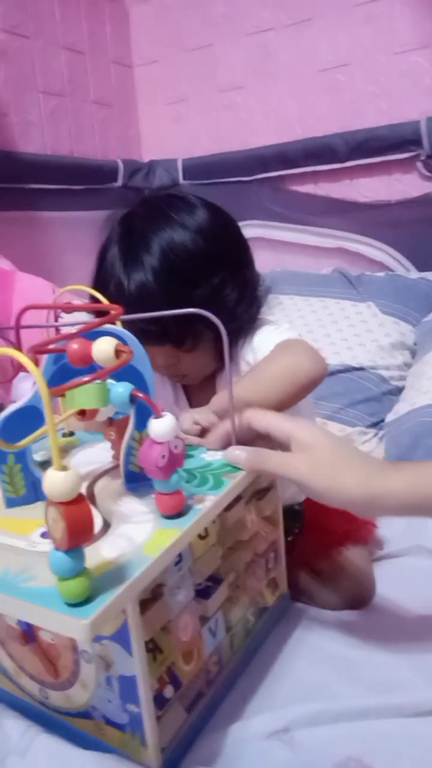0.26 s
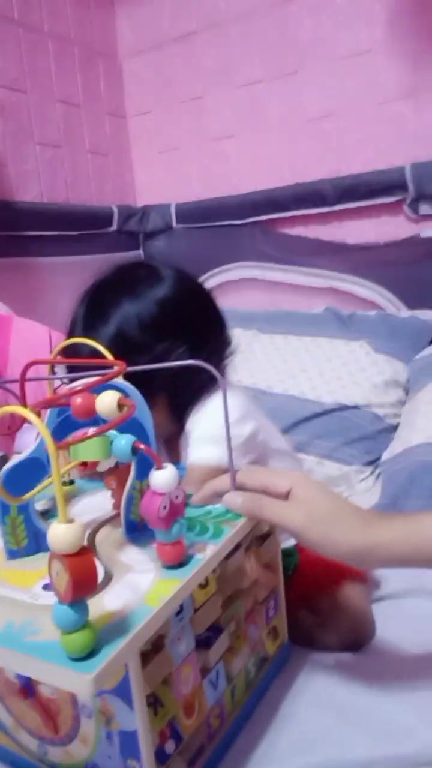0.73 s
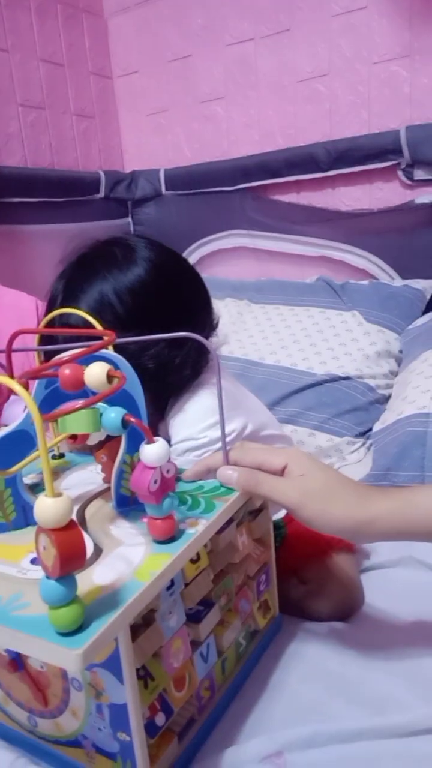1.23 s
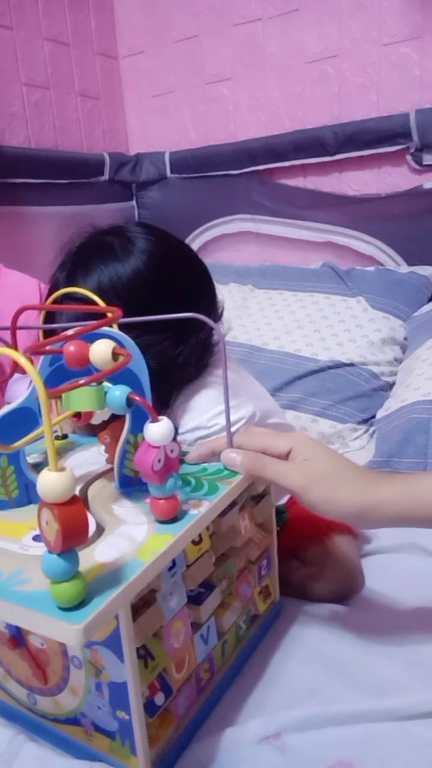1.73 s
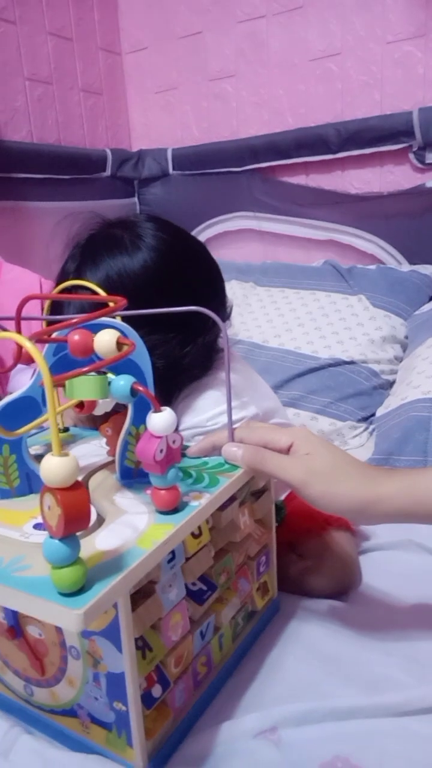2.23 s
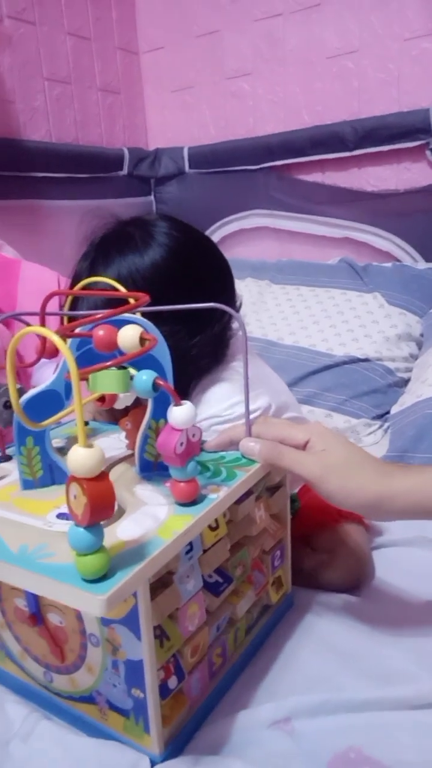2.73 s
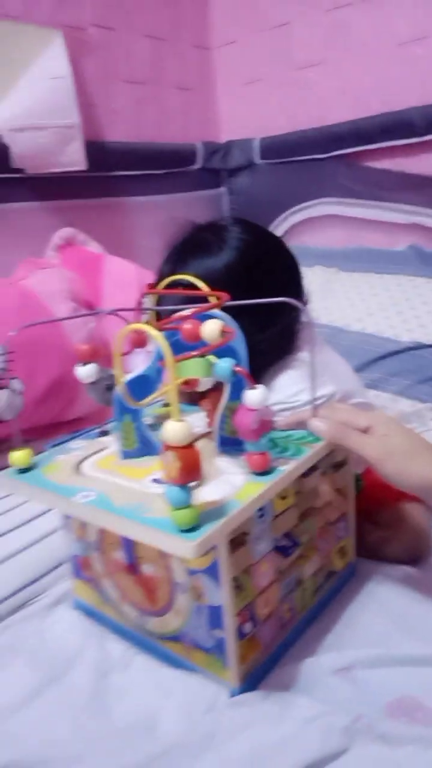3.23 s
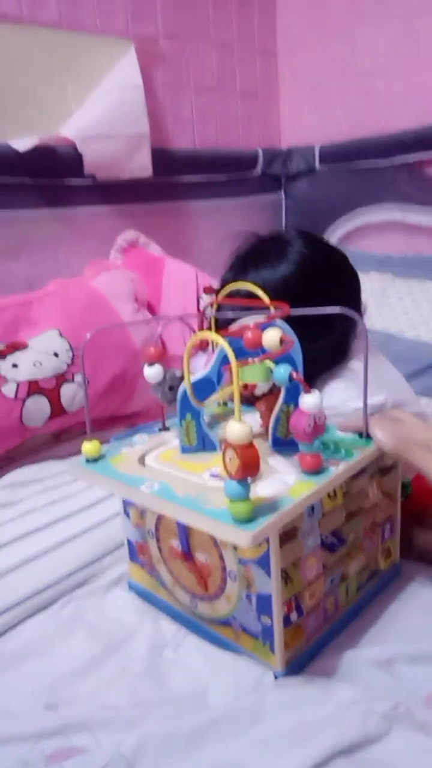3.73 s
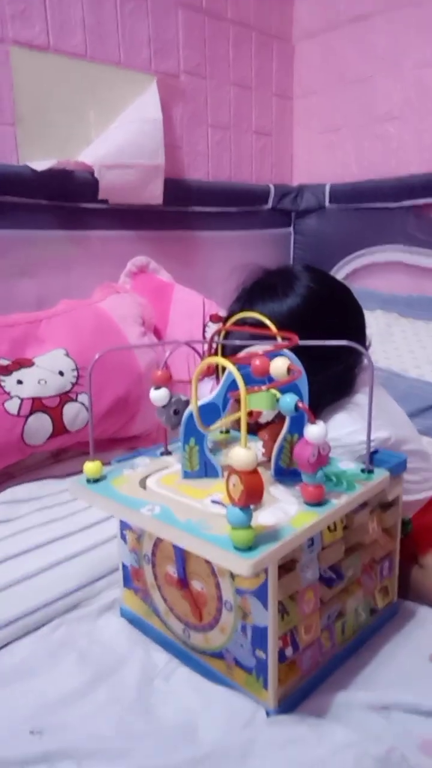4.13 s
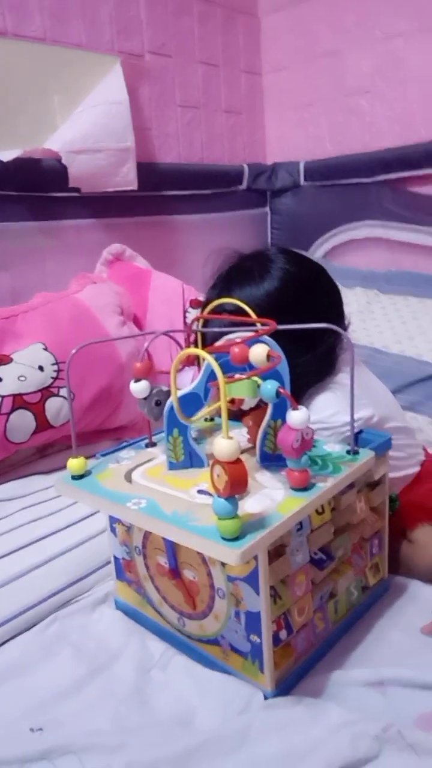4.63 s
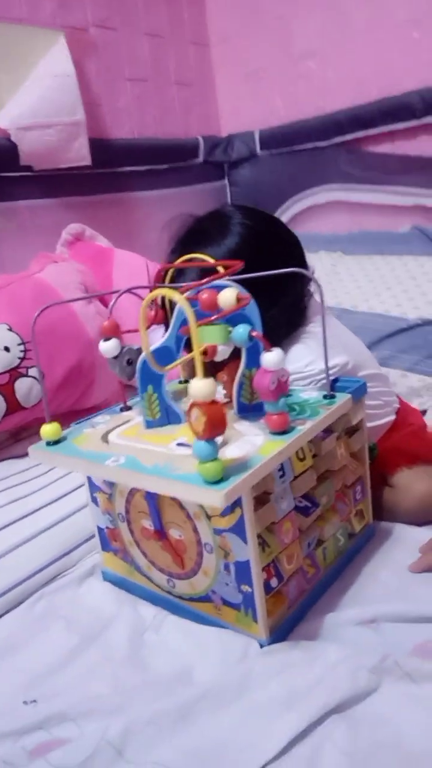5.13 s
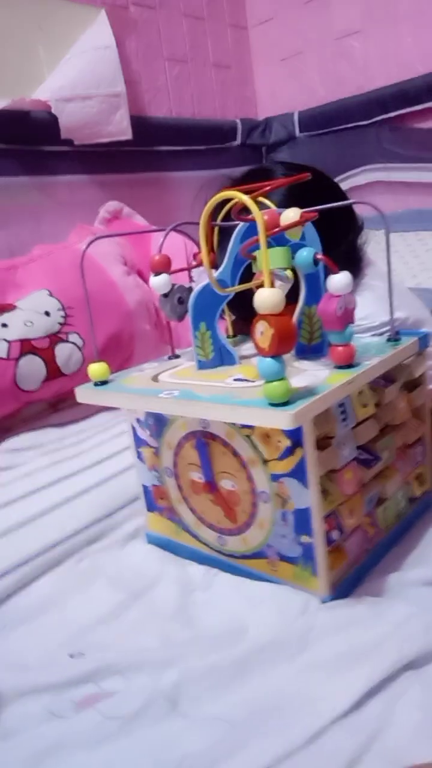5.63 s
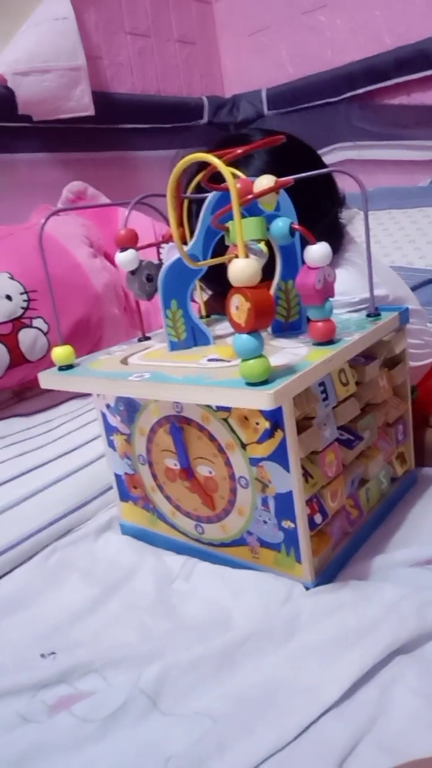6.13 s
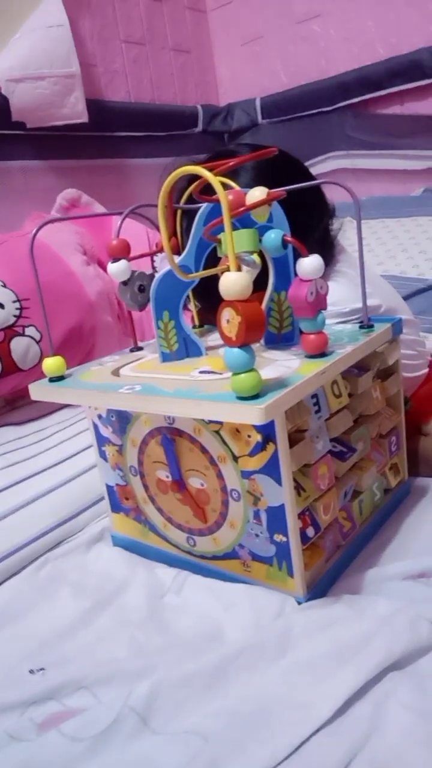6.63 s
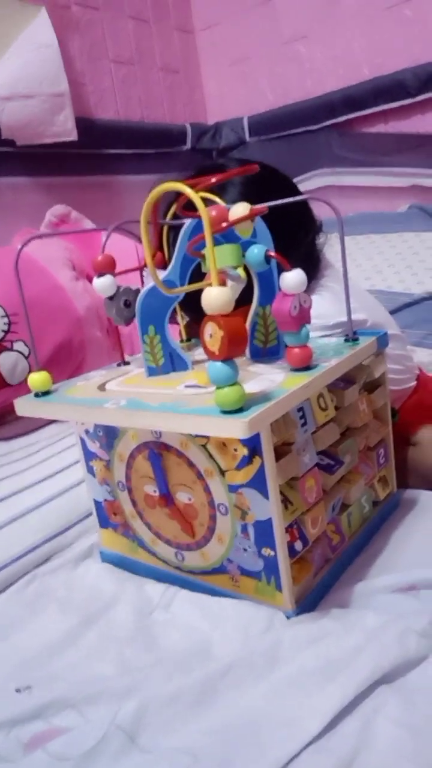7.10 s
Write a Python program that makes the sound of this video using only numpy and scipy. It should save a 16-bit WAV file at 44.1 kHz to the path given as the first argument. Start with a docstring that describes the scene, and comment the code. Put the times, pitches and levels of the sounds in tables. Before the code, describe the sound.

Close, dry wooden toy sounds recorded by a hand-held microphone: soft dragging and small knocks first, then busy, uneven clattering of beads and blocks on a hollow box. Afterwards come sparse clacks among dull bumps and sharp ticks of shifting grip, a short scraping creak with cloth rustle, and finally an almost silent small room with barely audible touches.

```python
"""Wooden activity cube on a bed

Beads and blocks clack, slide, rasp and creak on a hollow wooden box in a small soft room.
Blows and rubbing are bursts of noise or random contacts that set wooden parts ringing.
The hand holding the phone shifts its grip: dull pops and ticks, made as short pressure bumps.
Cloth rustle and a faint hum of shaped noise lie below."""
import sys
import numpy as np
from scipy import signal
from scipy.fft import rfft, irfft
from scipy.io import wavfile

SR = 44100
rng = np.random.default_rng(int(sys.argv[2]) if len(sys.argv) > 2 else 0)


def unload_wav(signal):
    """Save mono or channel-first audio to the path in sys.argv[1] as 16-bit WAV at rate SR, clipped to [-1, 1]."""
    wavfile.write(
        sys.argv[1],
        SR,
        np.round(np.clip(np.atleast_2d(signal).T, -1, 1) * 32767).astype(np.int16),
    )


N = 324576  # length [samples]


def from_db(db):
    """Turns decibels into a factor."""
    return 10 ** (np.asarray(db) / 20)


def rms_one(x):
    """Scales a sound to an average (rms) strength of 1."""
    return x / np.sqrt(np.mean(x ** 2) + 1e-20)


def coloured(x, spectrum):
    """Shapes a noise to a spectrum, joining the points on a log frequency scale; rms 1."""
    hz, level_db = np.transpose(spectrum)
    grid = np.maximum(np.arange(N // 2 + 1) * SR / N, 1)
    gain = from_db(np.interp(np.log(grid), np.log(hz), level_db))
    return rms_one(irfft(rfft(x) * gain, N))


def drift(rate_hz):
    """Smoothed noise of rms 1 that wanders slower at a lower rate."""
    r = np.exp(-2 * np.pi * rate_hz / SR)
    noise = rng.standard_normal(N + SR)
    return rms_one(signal.lfilter([1], [1, -2 * r, r * r], noise)[SR:])  # drop the start-up second


def ring(x, hz, t60):
    """A resonance: a unit click starts a sine of height 1 that falls 60 dB in t60 seconds."""
    r = from_db(-60 / (t60 * SR))
    w = 2 * np.pi * hz / SR
    return signal.lfilter([0, np.sin(w)], [1, -2 * r * np.cos(w), r * r], x + 1e-18)


def grains(per_s, size_db):
    """Random contacts of uneven size and either sign, coming in clumps."""
    born = rng.random(N) < per_s * from_db(5.0 * drift(30)) / SR
    size = from_db(size_db * np.minimum(rng.exponential(1, N), 5))
    return born * size * rng.choice([-1, 1], N)


DRAG_ATTACK_S, DRAG_RELEASE_S = 0.028, 0.049  # at soft = 1


def stroke(start_s, length_s, soft=1):
    """Swells over the attack, holds, fades over the release; soft stretches both."""
    t = np.arange(N) / SR - start_s
    swell = t / (soft * DRAG_ATTACK_S)
    fade = 1 + (length_s - t) / (soft * DRAG_RELEASE_S)
    return np.clip(np.minimum(swell, fade), 0, 1) ** 2


def bass_cut(x):
    """The microphone's low cut thins the deep bass, so pressure bumps swing back and settle."""
    return signal.sosfilt(signal.butter(3, 80.0, "high", fs=SR, output="sos"), x + 1e-18)


def middle_band(x):
    """Keeps the middle of the wood sounds: trims deep bass and the treble above about 5 kHz."""
    x = signal.sosfilt(signal.butter(2, 140.0, "high", fs=SR, output="sos"), x + 1e-18)
    return signal.sosfilt(signal.butter(6, 5100.0, fs=SR, output="sos"), x)


HUM_DB = -55.5  # middle level, before the wavering
# colour of the room hum: (frequency [Hz], relative level [dB per Hz])
HUM_SPECTRUM = [(15, -31.5), (32, -13), (101, 3.5), (227, -3), (410, -8), (495, -3.5), (614, -14),
                (722, -2), (871, -11), (1570, -21), (2770, -17), (3930, -24), (5730, -42), (15500, -46.5)]


def hum():
    """Air and distant machinery: shaped noise whose level wavers slowly."""
    level = from_db(HUM_DB + 3.6 * drift(2.5))
    return level * coloured(rng.standard_normal(N), HUM_SPECTRUM)


SWISH_SOFT = 2.2  # swells and fades slower than a drag
# colour of brushing cloth and skin: (frequency [Hz], relative level [dB per Hz])
RUSTLE_SPECTRUM = [(710, -40.5), (1200, -7), (1950, -2), (2910, -12), (3610, -5.5), (6050, -15),
                   (8640, -16), (15800, -23.5)]
# thin high swishes, barely heard: (start [s], length [s], level [dB], centre [Hz])
SWISHES = [(5.397, 0.26, -65.5, 8960), (6.215, 0.092, -68, 7300), (6.496, 0.53, -82.5, 6900)]


def rustle(gain):
    """Cloth and skin brushing: fine bright grains, and a few narrow swishes."""
    fine = rng.standard_normal(N) + 0.55 * grains(4000, 3.0)
    broad = gain * from_db(1.8 * drift(30.13)) * coloured(fine, RUSTLE_SPECTRUM)
    t = np.arange(N) / SR
    tones = np.zeros(N)
    for start_s, length_s, db, hz in SWISHES:
        tones += from_db(db) * stroke(start_s, length_s, SWISH_SOFT) * np.sin(2 * np.pi * hz * t)
    return broad + drift(940) * tones  # random strength turns each tone into a narrow noise


PORT_HZ, PORT_T60_S, PORT_RING = 3250, 0.0028, 0.7  # the microphone port rings after a sharp tick
# grip pops on the phone body, the narrowest being dry ticks, before the port ring and bass cut:
# (time [s], pressure peak [dB], width [ms])
GRIP_POPS = [(0.057, -23, 1.9), (1.463, -22, 0.54), (3.029, -14.5, 1.06), (3.096, -20.5, 0.52),
             (3.113, -19, 0.82), (3.555, -16, 3.4), (3.338, -10.5, 0.5), (3.354, -10, 0.6),
             (3.3888, -20.5, 1.15), (3.4805, -24.5, 1.6), (3.643, -21, 0.7), (3.6646, -20, 0.58),
             (3.7063, -5, 0.74), (3.714, -17.5, 0.75), (3.7543, -7, 0.74), (3.8082, -6, 0.66),
             (4.1022, -12.5, 0.71), (4.1225, -22, 0.43), (4.1345, 3, 0.23), (4.1503, -12, 0.29),
             (4.2885, -27, 0.57), (4.6063, -21.5, 0.59), (4.6205, -18.5, 0.56), (4.6397, -10.5, 0.95),
             (4.6777, -13.5, 0.65), (4.84, -12.5, 0.97), (4.8687, -8.5, 0.61), (4.917, -5, 1.33),
             (4.945, -9.5, 0.68), (4.9744, -5, 0.84), (4.983, -9.5, 1.6), (4.991, -12.5, 0.71),
             (5.011, -12.5, 1.5), (5.0654, -13.5, 1.9), (5.0851, -13.5, 1.8), (5.3126, -4.5, 0.2),
             (7.282, -30, 2.45), (4.081, -29.5, 0.12), (4.084, -23, 0.11), (4.114, -25, 0.13),
             (4.1256, -20, 0.18), (4.1306, -13, 0.19), (4.144, -15.5, 0.1), (4.159, -25, 0.1),
             (5.175, -14.5, 0.088), (5.257, -24.5, 0.039), (5.282, -27, 0.052)]


def grip():
    """Bell-shaped pressure bumps at the microphone port, which rings at their steep sides."""
    bumps = np.zeros(N)
    for s, peak_db, width_ms in GRIP_POPS:
        near = int(s * SR) + np.arange(-300, 300)
        offset_ms = (near / SR - s) * 1000
        bumps[near] -= from_db(peak_db) * np.exp(-1.6 * (offset_ms / width_ms) ** 2)
    return bumps + PORT_RING * ring(np.gradient(bumps), PORT_HZ, PORT_T60_S)


CREAK_S, CREAK_GAP_S, CREAK_GAP_RATIO = 5.02, 0.013, .92  # start, first gap, each gap over the last
CREAK_DB, CREAK_SWELL_DB = -41, 1  # drive of the first slip, rise per slip over the first six steps


def creak():
    """The pushed box sticks and slips: fourteen ticks, crowding together, ring the clack modes."""
    k = np.arange(14)
    gaps = CREAK_GAP_S * CREAK_GAP_RATIO ** k * rng.uniform(0.98, 1.0, len(k))
    s = CREAK_S + np.cumsum(gaps) - CREAK_GAP_S
    strength_db = CREAK_DB + CREAK_SWELL_DB * np.minimum(k, 6) + rng.normal(0, 2.2, len(k))
    slips = np.zeros(N)
    slips[(s * SR).astype(int)] = from_db(strength_db)
    burst = signal.lfilter([1], [1, -from_db(-60 / (0.014 * SR))], slips + 1e-18)  # quick fade
    shaken = burst * rng.standard_normal(N)
    body = sum(from_db(db - 26) * ring(shaken, hz, CLACK_T60_S) for hz, db in CLACK_MODES)
    crack = from_db(-12.5) * burst * coloured(rng.standard_normal(N), SNAP_SPECTRUM)
    return middle_band(body) + crack


RASP_SOFT, RASP_T60_S = 0.52, 0.013  # swells and fades quicker than a drag; ringing time
# a bead drawn along a wire or edge, before the middle band filter:
# (start [s], length [s], level [dB], note [Hz])
BEAD_RASPS = [(1.317, 0.12, -37, 760), (1.365, 0.114, -47.5, 3720), (1.355, .04, -46, 3020),
              (5.041, 0.073, -40, 4080), (5.04, 0.075, -38, 2880), (5.069, 0.062, -40, 1930),
              (5.432, 0.17, -65.5, 3790), (5.558, .07, -64.5, 2500)]


def rasp():
    """A drawn bead rasps on one note: dense contacts into one resonance, under a stroke."""
    out = np.zeros(N)
    for start_s, length_s, db, hz in BEAD_RASPS:
        note = rms_one(ring(grains(1500, 2.1), hz, RASP_T60_S))
        out += from_db(db) * stroke(start_s, length_s, RASP_SOFT) * note
    return out


DRAG_UNEVEN_DB = 2.5  # pressure of the drag wavers
# drags of a hand, bead or block over the cube, levels before wavering and filtering:
# (start [s], length [s], wood scrape [dB], box rumble [dB], cloth rustle [dB])
CUBE_DRAGS = [(0, 0.44, -60, -53.5, -73.5), (0.611, 0.061, -60, -61, -72), (0.74, 0.1, -64.5, -48.5, -80),
              (0.825, 0.23, -48.5, -38.5, -64), (1.283, 0.09, -48.5, -41.5, -68),
              (1.376, 0.12, -44.5, -37, -61), (1.585, 0.18, -56, -42.5, -67.5),
              (1.788, 0.077, -49.5, -37, -60.5), (1.888, 0.37, -63, -46.5, -87),
              (2.267, 0.067, -48.5, -33, -56), (2.435, 0.074, -56, -68, -67), (2.562, .15, -43, -38.5, -59),
              (2.802, 0.23, -48.5, -43.5, -62), (2.949, 0.16, -51.5, -36, -66),
              (3.117, 0.24, -70, -38.5, -92), (3.33, 0.12, -55, -46, -63.5), (3.474, 0.31, -55, -43, -71),
              (3.785, 0.13, -58.5, -54.5, -60.5), (4.07, 0.084, -54, -38, -59),
              (4.242, 0.094, -64, -55, -62.5), (4.544, 0.14, -69, -46, -83),
              (4.839, 0.26, -60, -39.5, -75.5), (5.039, 0.081, -40, -29.5, -53),
              (5.128, 0.16, -49, -43, -52), (5.282, 0.11, -61, -66, -54), (5.411, 0.23, -63, -54, -63)]


def dragging():
    """The hand's pressure: gains of scrape, rumble and rustle, summed over all drags."""
    gains = np.zeros((3, N))
    for start_s, length_s, *levels_db in CUBE_DRAGS:
        gains += from_db(levels_db)[:, None] * stroke(start_s, length_s)
    return gains * from_db(DRAG_UNEVEN_DB * drift(15.0))


SCRAPE_TILT_DB = 5.5  # dragging is brighter than striking [dB per octave]


def sliding(scrape, rumble):
    """Wood dragged over wood and wire: dense contacts ring the same bodies as the blows."""
    bright = np.zeros(N)
    for hz, db in CLACK_MODES:
        gain = from_db(db + SCRAPE_TILT_DB * np.log2(hz / 2500))
        bright += gain * ring(grains(2500, 3.2), hz, 0.0087)
    touch = grains(800, 0.46)
    panel = rms_one(sum(from_db(db) * ring(touch, hz, PANEL_T60_S) for hz, db in PANEL_MODES))
    hollow = rms_one(sum(from_db(db) * ring(touch, hz, HOLLOW_T60_S) for hz, db in HOLLOW_MODES))
    return scrape * rms_one(bright) + rumble * (panel + 0.21 * hollow)


SETTLE_S = 0.015  # loose parts chatter on after a blow: time to fall to 37 %
OWN_NOTE_DB = 6  # level of the struck piece's own note, before the tilt


def struck(peak_db, modes, t60, stretch, rise_ms, settle_db, spread_db, detune,
           tilt_db=0, own_hz=None, push=0, first=0):
    """Each blow's rattle of contacts rings a body; neighbours, tuned otherwise, chatter on."""
    blow_table = np.array(CUBE_BLOWS)
    s = blow_table[:, 0]
    contact_ms = np.clip(blow_table[:, [4]], .3, 20)
    after = np.arange(2048)
    u = after / (stretch * contact_ms * SR / 1000)  # time counted in contact lengths
    noise = rng.standard_normal((len(s), 2, len(after)))
    # a first touch, then contacts that swell and fade
    rattle = noise[:, 0] * (u + 0.011) ** 0.86 * np.exp(-u) + first * (after == 0)
    # a steady push at the body's first mode swells and fades, making the note clearer
    rattle += push * u * np.exp(-u) * np.sin(2 * np.pi * modes[0][0] * after / SR)
    settling = noise[:, 1] * from_db(settle_db) * np.exp(-after / (SETTLE_S * SR))

    # chance axes: blow, strength or pitch, struck piece or neighbours, mode
    chance = rng.standard_normal((len(s), 2, 2, len(modes)))
    t = after[:1024] / SR
    body = np.zeros((len(s), 2, len(t)))
    for k, (hz, mode_db) in enumerate(modes):
        tilt = np.reshape(tilt_db, (-1, 1)) * np.log2(hz / 2500)
        gain = from_db(mode_db + spread_db * chance[:, 0, :, k] + tilt)
        pitch = hz * (1 + detune * chance[:, 1, :, k])
        body += gain[..., None] * np.sin(2 * np.pi * pitch[..., None] * t)
    if own_hz is not None:
        own_gain = from_db(OWN_NOTE_DB + tilt_db * np.log2(own_hz / 2500))
        body[:, 0] += own_gain[:, None] * np.sin(2 * np.pi * own_hz[:, None] * t)
    body *= (1 - np.exp(-t / (rise_ms / 1000))) * from_db(-60 * t / t60)  # ringing builds, then dies

    contacts = np.stack([rattle, settling], axis=1)
    blows = signal.fftconvolve(contacts, body, axes=2).sum(axis=1)
    blows *= (from_db(peak_db) / np.max(np.abs(blows), axis=1))[:, None]
    out = np.zeros(N)
    np.add.at(out, (s * SR).astype(int)[:, None] + np.arange(blows.shape[1]), blows)
    return out


CLACK_T60_S, HOLLOW_T60_S, PANEL_T60_S = .0065, 0.012, 0.017  # times to fall 60 dB
# blows on the cube, peaks before room and filters; contact time is limited, then stretched per part:
# (time [s], clack peak [dB], hollow tock peak [dB], panel thud peak [dB], contact time [ms],
#  clack tilt [dB per octave], struck piece's own note [Hz])
CUBE_BLOWS = [(0.053, -34.5, -40, -28, 8.5, 13, 1940), (0.0921, -22, -45, -37, 1.4, 11, 2000),
              (0.305, -28, -34.5, -29.5, 0.23, 12, 2500), (0.814, -45, -23.5, -53, 2.4, 5, 2180),
              (0.86, -39, -28.5, -32, 3.1, -9, 1980), (0.902, -30, -32, -24, 2.7, -5, 2450),
              (0.9197, -20, -26, -29, 3.1, -8.5, 2420), (0.936, -43, -16.5, -68, 5.1, 2, 1170),
              (0.9726, -29.5, -26.5, -46, 3.5, -2, 2590), (1.309, -19.5, -23.5, -26.5, 3, -14, 2360),
              (1.4343, -27.5, -28.5, -50, 1, 0, 2460), (1.452, -27.5, -17.5, -23, 1.25, -5, 1370),
              (1.6471, -19.5, -16.5, -15, 2.15, -7, 1150), (1.6678, -5, -7.5, -7.5, 2.1, 7.5, 3340),
              (1.6942, -22, -23, -24, 2.2, 7, 1150), (1.705, -10, -8.5, -23.5, 3.3, 5, 2940),
              (1.738, -2, -17, -9.5, 1.8, -2, 3620), (1.753, -19.5, -18.5, -25, 5.5, -2, 1220),
              (1.801, -29, -29.5, -48, 2.5, 8, 1260), (1.8934, -25.5, -34, -24, 4, -11, 2020),
              (1.9271, -22, -25.5, -21, 2.8, -1.5, 1250), (1.9649, -8.5, -3.5, -57, 4.04, 3, 3840),
              (1.985, -12.5, -34, -21.5, 4.6, 10, 2880), (2.023, -11, -15, -15.5, 1.07, -11, 2490),
              (2.083, -60, -28, -52, 2, -3, 1150), (2.101, -49, -30.5, -50, 1.5, 1, 2400),
              (2.127, -8, -19.5, -15.5, 2.3, -4.5, 2520), (2.1897, -55, -47, -26, 1.4, 2.3, 1150),
              (2.225, -50, -49, -27, 1.6, 0, 1150), (2.2931, -19.5, -17, -15.5, 4.3, 2.5, 2310),
              (2.3088, -2.5, -11.5, -9, 1.46, 9, 2460), (2.3934, -7, -14.5, -11.5, 2.04, -7.5, 3600),
              (2.5047, -18, -15, -12, 1.66, -8, 2540), (2.5182, -43, -23.5, -19.5, 1.6, -13, 1160),
              (2.5398, -2, -12.5, -14, 1.5, 8, 3604), (2.5785, -1, -15.5, -42, 1.88, -9.5, 2250),
              (2.6137, -9, -11.5, -14.5, 1.57, -6, 2830), (2.6971, -17.5, -9, -54.5, 5.3, 17, 2300),
              (2.718, -28.5, -26, -45, 1.6, 1, 2350), (2.7543, -26, -30, -31.5, 2.3, 0.5, 2340),
              (2.7672, -22, -13.5, -20.5, 1.2, 0, 1140), (2.874, -2.5, -22, -15, 0.76, 0, 3780),
              (2.8882, -10.5, -20, -15, 0.63, -22, 3460), (2.922, -41, -26, -20, 1.5, -18, 1150),
              (2.9407, -42, -48, -23, 1.4, -4, 1150), (2.9846, -22, -23, -22.5, 0.61, -1, 1150),
              (3.214, -23.5, -30.5, -55, 3.4, -14, 1230), (3.254, -27.5, -35, -55, 4.1, -27, 1680),
              (3.3885, -31, -62, -48.5, 10, -1, 2020), (3.531, -6, -22, -39, 0.55, -10.5, 1314),
              (3.555, -26, -29, -25.5, 0.65, -3.5, 1260), (3.877, -11, -8.5, -17.5, 4.1, 15.5, 3110),
              (5.162, -11.5, -13.5, -42, 1.4, 15, 4130), (5.194, -37, -28.5, -53, 1.5, 5, 3500),
              (5.3112, -18.5, -20.5, -11.5, 1.2, 26, 2340), (5.516, -58, -33.5, -67, 3.9, -5, 1930),
              (6.2526, -59, -37, -51, 23, 15, 1460), (6.379, -46, -56, -43, 5.1, 31, 3480),
              (6.768, -53.5, -65, -38.5, 3, -5, 2160)]
# beads and thin blocks: (frequency [Hz], relative level [dB])
CLACK_MODES = [(1150, -9), (1260, -4.5), (2020, 3), (2300, 2.5), (2550, 3.5), (2900, 1), (3200, -1),
               (3600, 1), (4050, -9), (4450, -18.5), (4900, -23.5)]
# air and walls of the box: (frequency [Hz], relative level [dB])
HOLLOW_MODES = [(840, -0.5), (965, -14)]
# large sides of the box: (frequency [Hz], relative level [dB])
PANEL_MODES = [(250, -13), (330, 5), (430, -4), (540, -10)]
# colour of the contact crack: (frequency [Hz], relative level [dB per Hz])
SNAP_SPECTRUM = [(4000, -23), (5500, 1), (7500, -12), (11000, -14), (14500, -23.5)]


def knocks():
    """Bright clack, hollow tock that builds up more slowly, panel thud and a brief crack."""
    s, clack_db, tock_db, thud_db, _, tilt_db, own_hz = np.transpose(CUBE_BLOWS)
    clack = struck(clack_db, CLACK_MODES, CLACK_T60_S, 0.83, 0.79, settle_db=-19.0, spread_db=2.5,
                   detune=0.05, tilt_db=tilt_db, own_hz=own_hz, first=2.7)
    tock = struck(tock_db, HOLLOW_MODES, HOLLOW_T60_S, 0.98, 1.5, settle_db=-30.5, spread_db=0,
                  detune=0.072, push=0.21)
    thud = struck(thud_db, PANEL_MODES, PANEL_T60_S, 0.86, 3.0, settle_db=-31.0, spread_db=1.0,
                  detune=0.09)
    marks = np.zeros(N)
    marks[(s * SR).astype(int)] = from_db(clack_db + .5 * tilt_db - 35.5)  # brighter blows crack more
    dying = signal.lfilter([1], [1, -from_db(-60 / (0.034 * SR))], marks + 1e-18)
    crack = dying * coloured(rng.standard_normal(N), SNAP_SPECTRUM)
    return middle_band(clack + tock + thud) + crack


ROOM_T60_S, ROOM_DB, WALL_CUT_HZ = .15, -12.5, 2200  # tail; its level before the treble loss; its cut
ECHO_S, ECHO_DB = 0.011, -16  # nearest wall, level before the treble loss


def room(x):
    """One wall echo and a short diffuse tail, dull in the treble."""
    t = np.arange(int(.4 * SR)) / SR
    reply = rng.standard_normal(len(t)) * from_db(-60 * t / ROOM_T60_S) * np.minimum(t / 0.019, 1)
    reply *= from_db(ROOM_DB) / np.sqrt(np.sum(reply ** 2))
    reply[int(ECHO_S * SR)] += from_db(ECHO_DB)
    reply = signal.lfilter(*signal.butter(1, WALL_CUT_HZ, fs=SR), reply)
    return x + signal.fftconvolve(x, reply)[:N]


def scene():
    """Adds the sources; only the blows get the room's echo, and the hum joins after the low cut."""
    scrape, rumble, brush = dragging()
    rubbing = middle_band(sliding(scrape, rumble) + rasp())
    handling = room(knocks()) + rubbing + creak() + rustle(brush) + grip()
    return (bass_cut(handling) + hum())[None]


CUTOFF_HZ = 16450


def record(dry):
    """Peaks are softly rounded, then a steep filter cuts the top."""
    rounded = 1.1 * np.tanh(dry / 1.1)
    return signal.sosfilt(signal.cheby2(12, 70, CUTOFF_HZ, fs=SR, output="sos"), rounded)


dry = scene()
out = record(dry)
unload_wav(out)
```